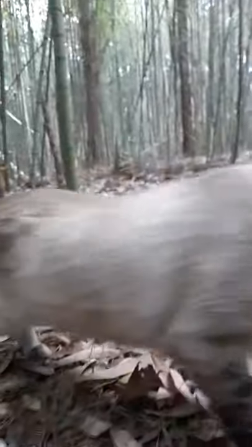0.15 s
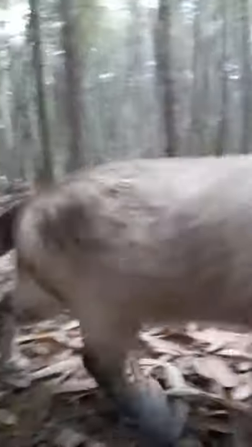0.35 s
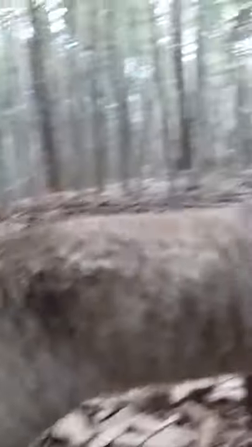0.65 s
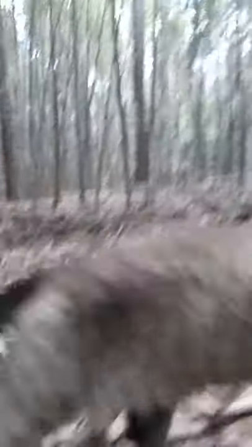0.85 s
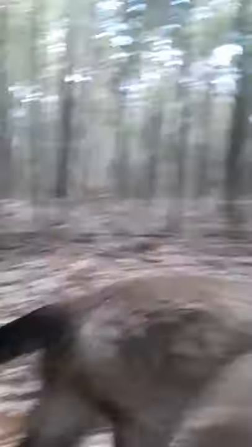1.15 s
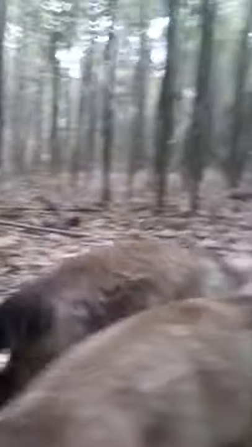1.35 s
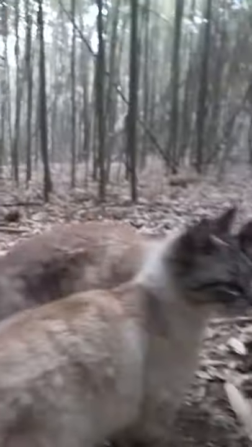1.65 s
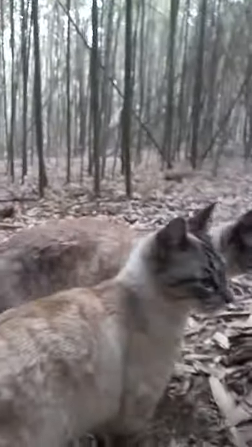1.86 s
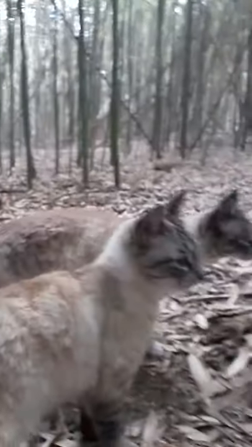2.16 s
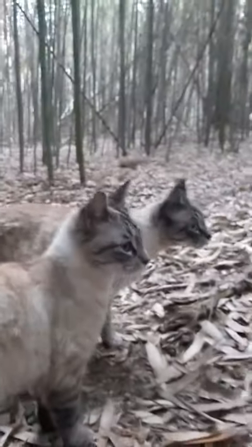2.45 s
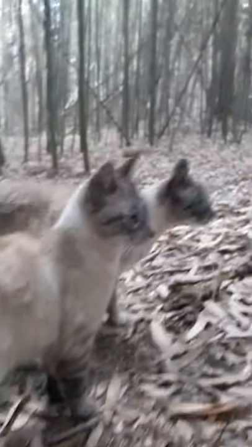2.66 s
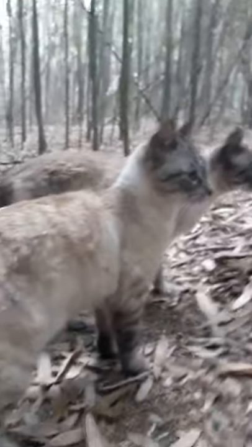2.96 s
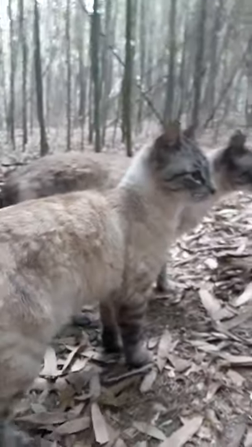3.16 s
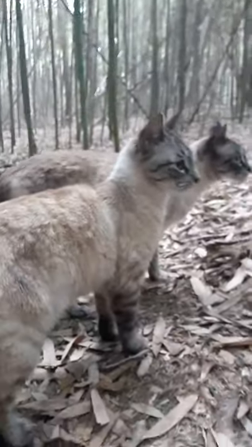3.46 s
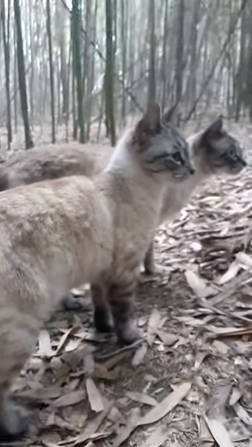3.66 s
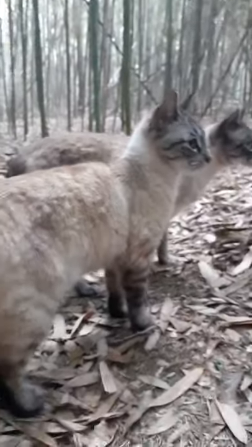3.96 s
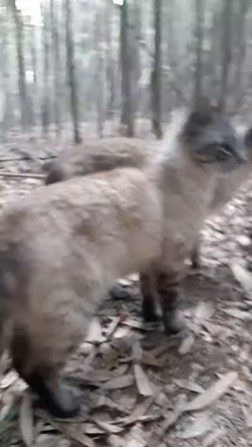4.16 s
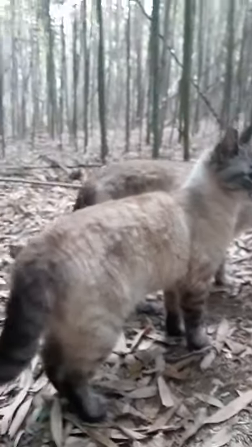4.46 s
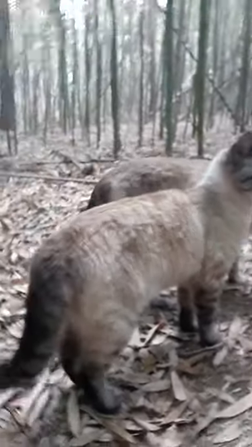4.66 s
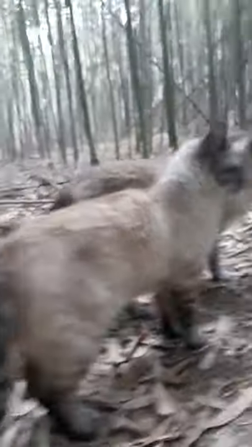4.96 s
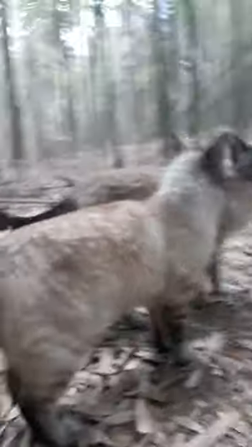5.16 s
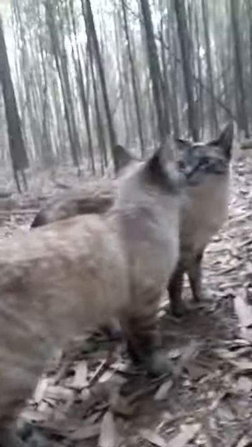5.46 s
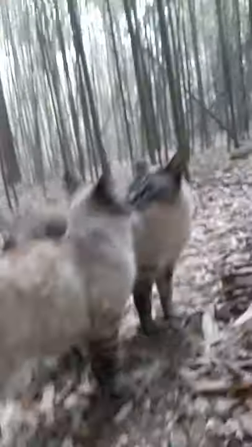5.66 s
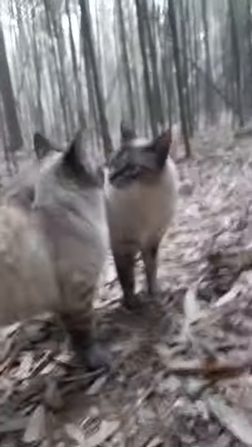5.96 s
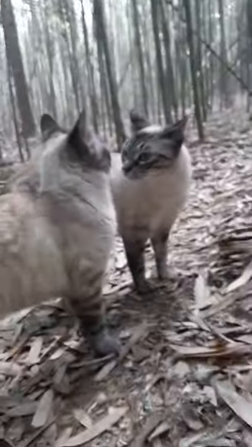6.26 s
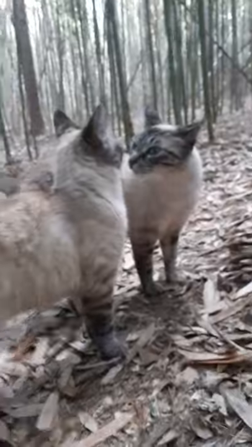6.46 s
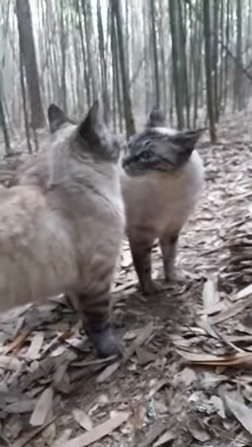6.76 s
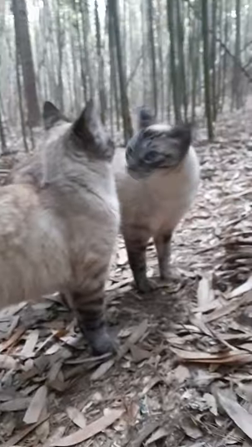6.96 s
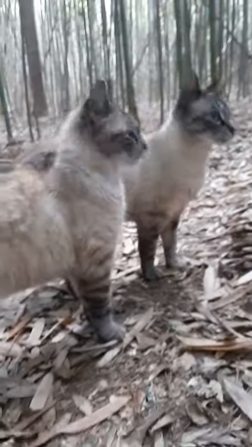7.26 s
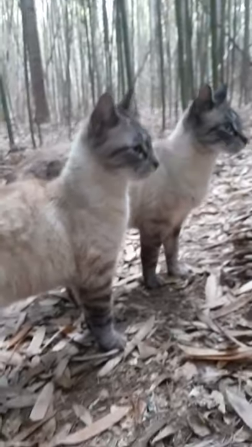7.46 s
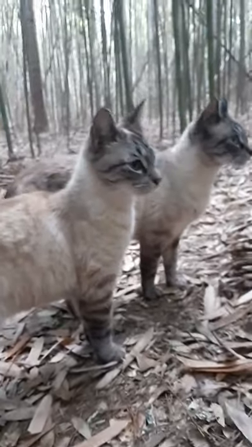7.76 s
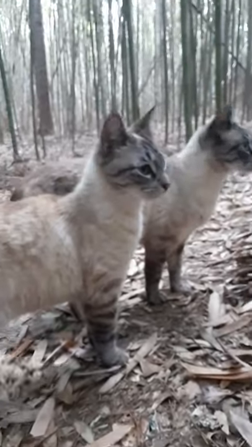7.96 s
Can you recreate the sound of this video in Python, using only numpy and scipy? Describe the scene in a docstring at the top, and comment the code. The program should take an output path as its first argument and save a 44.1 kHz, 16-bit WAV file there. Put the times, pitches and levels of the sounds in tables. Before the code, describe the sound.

Crisp leaf litter rustles near the microphone in bursts, a distant bird whistling fast rising phrases, pausing, then resuming over faint forest air.

```python
"""Dry leaves rustle close by as cats tread them, while a songbird repeats a three-note phrase far off.
The rustle is dense puffs of noise over a scrape; snaps are noise bursts with a ring, thuds damped sines.
The bird is gliding sine tones, smeared by the stems of a bamboo wood into long decaying echoes.
A distant low rumble of narrow noise bands and a faint wide hiss lie beneath it all."""
import sys
import numpy as np
from scipy import signal
from scipy.fft import rfft, irfft, next_fast_len
from scipy.io import wavfile
from scipy.ndimage import uniform_filter1d

SR = 44100
rng = np.random.default_rng(int(sys.argv[2]) if len(sys.argv) > 2 else 0)


def master_out(mix):
    """Clip the mix to full scale and print it as 16-bit PCM to the path in sys.argv[1]."""
    frames = np.transpose(np.atleast_2d(mix))
    ceiling = np.clip(frames, -1, 1)
    pcm = np.round(ceiling * 32767).astype(np.int16)
    wavfile.write(sys.argv[1], SR, pcm)


N = 357210

# spectrum of breaking dry leaf: frequency_hz, density_db (relative, per Hz)
LEAF = [(180, -53), (300, -18.5), (725, -15.5), (1100, -12.5), (1600, -9.5), (2200, -14), (3100, -5),
        (4500, -6), (5400, -6), (6740, -3), (8940, -9), (14200, -2.5), (16000, -6)]
# glides of single notes, shared by the phrases and calls: after_start_s, pitch_hz, level_db (relative)
ARCH = [(0, 1450, -15), (.012, 1880, -8), (.02, 2000, -3), (.045, 1800, -3.5), (.075, 1520, -11)]
FLICK = [(0, 2220, -7), (.006, 2480, -1.5), (.015, 2790, 2), (.024, 2800, -2.5), (.036, 2790, -22)]
RISE = [(0, 3030, -13), (.022, 3400, -2.5), (.043, 3720, 1.5), (.056, 3760, 0.5), (.07, 3700, -7.5),
        (.082, 3620, -16)]
SLOW_ARCH = [(0, 1255, -9), (.025, 1565, -10), (.04, 1741, 1.5), (.075, 1550, -1), (.115, 1302, -8.5)]
SLOW_FLICK = [(0, 1986, -4), (.018, 2332, -0.5), (.032, 2350, -2.5), (.043, 2425, -19.5)]
SLOW_RISE = [(0, 2934, -5), (.02, 3310, 2.5), (.036, 3610, -1.5), (.047, 3640, -6), (.055, 3700, -17)]
WHISTLE = [(0, 2226, -20), (.02, 2240, -9.5), (.07, 2138, -8.5), (.12, 2290, -11), (.2, 2663, 0.5),
           (.26, 2980, -1), (.285, 3016, -3.5), (.295, 3060, -24)]
SEET = [(0, 6870, 5), (.03, 7300, 1), (.05, 7750, 1), (.07, 7500, -16)]
# arch, flick, rise; the slow phrase drags and drops: note glide, after_start_s, level_db (relative)
QUICK = [(ARCH, 0, -9), (FLICK, .09, -5), (RISE, .134, 0)]
SLOW = [(SLOW_ARCH, 0, -14), (SLOW_FLICK, .148, -5.5), (SLOW_RISE, .194, 0)]


def undb(db):
    """Turn decibels into an amplitude factor."""
    return 10 ** (np.asarray(db) / 20)


def unit(x):
    """Scale to an RMS of 1."""
    return x / np.sqrt(np.mean(x ** 2))


def colour(x, points, lo_hz=1., hi_hz=30200.0):
    """Shape x by a (Hz, dB) spectrum between two soft edges."""
    size = next_fast_len(x.shape[-1])
    f = np.arange(size // 2 + 1) * SR / size + 1e-3
    hz, db = np.array(points).T
    gain = undb(np.interp(np.log(f), np.log(hz), db))
    edges = np.sqrt((1 + (lo_hz / f) ** 6) * (1 + (f / hi_hz) ** 6))
    return irfft(rfft(x, size) * gain / edges, size)[..., :x.shape[-1]]


def ring(x, hz, width_hz):
    """One resonance, gain 1 at the centre."""
    return signal.lfilter(*signal.iirpeak(hz, hz / width_hz, SR), x)


def walk(rate):
    """Random levels held 1 / rate s and slewed twice; spread near 1."""
    hold = int(SR / rate)
    steps = np.repeat(rng.standard_normal(N // hold + 1), hold)
    return 1.35 * uniform_filter1d(uniform_filter1d(steps, hold), hold)[:N]


def part_shared_noise(common, length):
    """Noise for two ports, of which the power share common is alike at both."""
    shared = np.sqrt(common) * rng.standard_normal(length)
    return shared + np.sqrt(1 - common) * rng.standard_normal((2, length))


def ports(x, pan_db, lag):
    """Two spaced ports: the left hears x lag samples later and pan_db louder than the right."""
    n = np.arange(len(x[0]))
    late = np.clip(n - np.rint(lag).astype(int), 0, n[-1])
    return np.array([x[0][late] * undb(pan_db / 2), x[1] * undb(-pan_db / 2)])


def add(out, start_s, x):
    """Mix x into out from start_s, trimming whatever falls outside."""
    i = int(start_s * SR)
    x = x[..., max(-i, 0):N - i]
    out[..., max(i, 0):max(i, 0) + x.shape[-1]] += x


def cats(s):
    """Port lag in samples and left-minus-right dB at time s, as the cats move about."""
    # where the cats are: time_s, left_lag_samples, left_minus_right_db
    places = [(0, 7.5, -3), (.45, 9.3, -3), (.83, 9.6, -2), (1.1, 12.8, -3.5), (1.7, 16.3, -5.5),
              (3, 16.7, 0), (4.3, 19.2, -6.5), (4.8, 17.7, -4.5), (5.6, 18.5, -4.5), (6.15, 21.6, -11),
              (6.7, 18.8, -7), (8.1, 18.9, -1.5)]
    at, lag, pan_db = np.transpose(places)
    return np.interp(s, at, lag), np.interp(s, at, pan_db)


def scuffing():
    """Gains of crunch, middle, treble and sheen: every scuff swells and dies away, and their powers add."""
    # a paw or tail scuffs the leaves: peak_s, treble_db (relative), swell_s and die_s (per 20 dB, sign
    # ignored), crunch_db (low band against treble), bright_db (raises the sheen, lowers the middle)
    scuffs = [(.002, -31.5, 2, 0.06, -18, 0.), (.1, -50.5, 0.6, 0.34, -24, 0.),
              (0.202, -38.5, 0.07, 0.09, -27, 0.7), (0.397, -34, .17, 0.1636, -22, -0.1),
              (.85, -42, 0.16, 0.16, -25.5, 2.5), (0.968, -42.5, 0.27, 0.14, -27, -0.3),
              (1.17, -56, -0.1, 0.32, -31, .6), (1.35, -51, 1, 0.36, -29, -0.9),
              (1.63, -52, 0.03, 0.38, -20, 0.), (1.76, -57, 0.3, .5, -29, 0),
              (2.5, -65.5, .3, 0.27, -16, -0.5), (3.3, -70.5, 0.8, 0.56, -11, -1),
              (3.515, -64.5, 0.1, 0.1, -25.5, 1.5), (3.69, -69.5, -0.05, 0.03, -27, 0.),
              (3.974, -62, .025, .07, -30, 9.), (4.21, -60.5, .08, 0.5, -25, -2),
              (4.3, -52.5, 0.01, 1.5, -25, -0.5), (4.422, -41, 0.0877, 0.14, -37, 1.5),
              (4.57, -50, 0.29, -0.3, -21, -2.5), (4.671, -38, 0.0673, 0.0054, -22, -.6),
              (4.745, -35.5, .025, 0.1832, -22, -2.5), (4.845, -35.5, 0.2038, 0.0559, -15.5, 0.5),
              (4.94, -47.5, 0.1, 0.14, -24, 1), (5.03, -56, 0.05, 0.36, -11.5, 0),
              (5.211, -50.5, 0.28, 0.06, -19, -1.5), (5.35, -56, 0, .5, -19.5, 1.5),
              (5.61, -53, 0.39, 0.34, -16, 0.), (5.8, -65, 0.9, 0.65, -20, -0.5),
              (6.13, -48, 0.2, 0.09, -30.5, 1), (6.175, -51, 0.11, -0.02, -30, 1),
              (6.26, -54.5, 0, -0.23, -30, 0.5), (6.31, -59, .03, 0, -22, 0.),
              (6.38, -56.5, 0, 0.03, -24.5, 0.), (6.46, -60, -0.3, 0.2, -27, 3),
              (6.592, -54.5, 0, 0.15, -27, 1), (6.77, -65.5, 2.8, 0.26, -23, 0.3),
              (6.95, -74, -0.5, .14, -26, 3), (7.33, -63.5, 0.1, 0.23, -33, 1.5),
              (7.9, -70, 1.6, 8.5, -18.5, 2.5)]
    stir_db, stir_crunch_db = -86, -6  # leaves never lie quite still
    t = np.arange(0, N + 64, 64) / SR
    power = undb(2 * (stir_db + np.array([[stir_crunch_db], [0], [0], [0]])))
    for peak_s, db, swell_s, die_s, crunch_db, bright_db in scuffs:
        level_db = db - 20 * np.maximum((peak_s - t) / abs(swell_s), (t - peak_s) / abs(die_s))
        band_db = np.array([[crunch_db], [-bright_db], [0], [bright_db]])
        power = power + undb(2 * (level_db + band_db))
    return (np.interp(np.arange(N) / SR, t, np.sqrt(p)) for p in power)


def rustle(breaks_per_s=900., spread_db=4.0, tail_s=0.0014, scrape=0.33):
    """Tiny fractures of very uneven size, each a short puff of noise, over the scrape of leaf on leaf."""
    crunch, middle, treble, sheen = scuffing()
    lag, pan_db = cats(np.arange(N) / SR)
    sizes = undb(spread_db * np.minimum(rng.exponential(size=N), 3.5))
    breaks = (rng.random(N) < breaks_per_s / SR) * sizes
    middle = middle * undb(-4.5 + 0.58 * pan_db)  # the middle dulls as the cats move to the right
    # each break puffs in all four bands; the lower the band, the longer the puff: low_edge_hz,
    # high_edge_hz, gain, level_db, tail factor, power share common to both ports, shading factor
    bands = [(256, 1390, crunch, 3.0, 3.0, 0.77, 0.8),
             (1330, 4600, middle, 0, 2.2, 0.25, 0.82),
             (4060, 7750, treble, -3.0, 1.95, 0.12, 0.8),
             (8360, 13700.0, sheen, -1.5, 1.3, 0.13, 1.22)]
    out = 0
    for lo, hi, gain, db, longer, common, shade in bands:
        hits = breaks ** (1 / longer ** 0.24) * undb(4.8 * rng.standard_normal(N))
        decay = np.exp(-1 / (tail_s * longer * SR))
        puffs = unit(signal.lfilter([1], [1, -decay], hits))
        noise = part_shared_noise(common, N)
        band = unit(colour(noise * (puffs + scrape), LEAF, lo, hi))
        uneven = undb(db + 2.22 * walk(25))
        out = out + ports(band * gain * uneven, shade * pan_db, lag)
    return out


def stems(x, t60_s, build_s, common=0.22, dull_hz=5000.0, patchy_db=1.5):
    """Scatter from countless stems: a decaying noise tail of unit energy; the treble dies twice as fast."""
    t = np.arange(int(1.6 * SR)) / SR
    fade = np.exp(-np.log(1000) * t / t60_s)
    noise = part_shared_noise(common, len(t))
    low = signal.lfilter(*signal.butter(2, dull_hz, fs=SR), noise)
    tail = (low + (noise - low) * fade) * fade * (1 - np.exp(-t / build_s))
    # stems stand in clumps, so the echoes come in bunches
    tail = tail * undb(patchy_db * walk(38.5)[:len(t)])
    tail = tail / np.sqrt(np.sum(tail ** 2) / 2)
    return signal.fftconvolve(x[None], tail)[:, :N]


def whistle_note(shape, pitch_factor, db):
    """One pure tone that glides in pitch and swells along its shape."""
    at, hz, swell_db = np.transpose(shape)
    t = np.arange(int(at[-1] * SR)) / SR
    edge = np.clip(np.minimum(t, at[-1] - t) / 0.0018, 0, 1)
    # the syrinx rounds every corner of the glide
    glide = uniform_filter1d(pitch_factor * np.interp(t, at, hz), size=260, mode="nearest")
    tone = np.sin(2 * np.pi * np.cumsum(glide) / SR)
    return np.sqrt(2) * tone * edge * undb(db + np.interp(t, at, swell_db))


def bird():
    """Pure gliding whistles, heard direct and through the wood."""
    # phrase kind, start_s, pitch factor of the last note, level_db, extra_db of the earlier notes
    phrases = [(QUICK, -0.18, 1, -58, 0.), (QUICK, .122, .94, -51, 0.), (QUICK, .402, .94, -48.5, -1.7),
               (QUICK, .688, 1, -48.5, .5), (QUICK, 0.97, 0.97, -46, 0.), (QUICK, 1.246, .98, -46, 1.5),
               (QUICK, 1.528, 0.97, -46.5, -1.5), (QUICK, 1.804, .99, -46, -.6),
               (QUICK, 2.081, 0.99, -46, -.6), (SLOW, 2.368, 0.96, -50.5, -0.54),
               (SLOW, 2.711, 0.98, -49, .6), (SLOW[:1], 3.075, .94, -50.5, 0.),
               (QUICK, 7.48, 0.97, -46, -2.1), (QUICK, 7.755, .97, -45.5, -2.2),
               (QUICK, 8.035, .97, -45, -0.56)]
    # single calls: note glide, start_s, pitch factor, level_db
    lone_calls = [(SEET, 2.545, 1.001, -60), (SEET, 6.405, 1.001, -60.5), (WHISTLE, 6.522, 1.015, -55),
                  (WHISTLE, 7.11, .99, -50)]
    # peep glide: after_start_s, pitch_hz, level_db (relative)
    peep = [(0, 2784, -7), (.02, 2778, -0.5), (.05, 2770, -12), (.065, 2770, -19)]
    # near and far stems: t60_s, build_up_s, level_db
    wood = [(.3, 0.0036, -4), (.95, 0.018, -3.5)]

    notes = []
    for kind, start_s, last_factor, db, earlier_db in phrases:
        for k, (shape, after_s, part_db) in enumerate(kind):
            last = k == len(kind) - 1
            factor = last_factor if last else 1
            note_db = db + part_db + (0 if last else earlier_db)
            notes.append((shape, start_s + after_s, factor, note_db))
    notes += lone_calls
    # a second bird: five even peeps
    notes += [(peep, 3.33 + k * 0.2025, 1, -75) for k in range(5)]

    song = np.zeros(N)
    for shape, start_s, factor, db in notes:
        if -shape[-1][0] < start_s < N / SR:
            add(song, start_s, whistle_note(shape, factor, db))
    echoes = sum(undb(db) * stems(song, t60_s, build_s) for t60_s, build_s, db in wood)
    # leaves on the way make the direct sound tremble
    direct = song * undb(-2.5 + 2.5 * walk(70.))
    return ports(direct + echoes, pan_db=2, lag=-10)


def air():
    """Faint wide hiss and a wavering low rumble; the bass is alike at both ports."""
    # hiss spectrum: frequency_hz, density_db (relative, per Hz)
    hiss_spectrum = [(25, -24), (40, -10.5), (60, -8), (100, -3.5), (130, -1.5), (200, -9), (300, -14.5),
                     (500, -21), (1000, -24.5), (2000, -27.5), (3500, -28), (7300, -21.5), (9500, -30.5),
                     (16000, -32)]
    # rumble bands: centre_hz, width_hz (of each of two passes), start_db, end_db
    rumble_bands = [(71.5, 26, -84.5, -78.5), (114.5, 26, -76, -80.5), (139.3, 20.4, -90, -72),
                    (170.9, 13, -84.5, -77)]
    # likeness of the ports: frequency_hz, power share common to both
    likeness = [(60, 0.95), (250, 0.74), (700, 0.32), (1500, 0.11)]
    hz, like = np.array(likeness).T
    shared = colour(rng.standard_normal(N), np.c_[hz, 10 * np.log10(like + 1e-3)])
    separate = colour(rng.standard_normal((2, N)), np.c_[hz, 10 * np.log10(1 - like)])
    noise = shared + separate
    rumble = 0
    for centre_hz, width_hz, start_db, end_db in rumble_bands:
        level = undb(np.linspace(start_db, end_db, N) + 2.7 * walk(1.45))
        band = ring(ring(noise, centre_hz, width_hz), centre_hz, width_hz)
        rumble = rumble + level * unit(band)
    return undb(-69.0) * unit(colour(noise, hiss_spectrum)) + rumble


def snaps(fade_s=0.00075):
    """A dry leaf breaks: a wide crack, a brief ring of the flake, a knock in the litter."""
    # time_s, level_db (relative), ring_hz, body_db (relative)
    breaking_leaves = [(0.0897, -24, 10400, -36.5), (0.1463, -32, 7140, -38), (0.1825, -41, 6060, -39),
                       (0.1998, -22.5, 6600, -39), (0.392, -26, 6300, -30.5), (0.4057, -22, 6650, -28.5),
                       (0.4224, -26, 6230, -20.5), (0.4602, -25, 5830, -20.5), (0.493, -34.5, 5700, -17),
                       (0.5183, -39, 5600, -17), (0.782, -33, 6650, -35), (0.818, -24, 7640, -33.5),
                       (0.833, -28.5, 5040, -27), (0.8635, -22, 5300, -26), (0.9735, -32, 4900, -26.5),
                       (1.148, -35.5, 11200, -42), (1.3873, -36, 6030, -29), (1.4441, -43, 5390, -36),
                       (1.6155, -32, 12100, -24), (1.6293, -30, 6620, -29), (1.6992, -39, 6030, -40),
                       (1.7397, -32.5, 11370, -45), (1.8845, -45.5, 5920, -18), (1.9442, -40.5, 10270, -41),
                       (2.5376, -38, 6850, -38), (3.5244, -55, 5010, -26), (3.683, -56, 6520, -32),
                       (3.9744, -49, 10500, -40.5), (4.2063, -45, 4300, -36), (4.2843, -33.5, 4200, -42),
                       (4.361, -41, 6630, -40), (4.3795, -36, 4380, -37), (4.3965, -22.5, 11400, -54),
                       (4.4188, -24.5, 6800, -40), (4.4333, -25.5, 6740, -54), (4.4428, -27.5, 7200, -44),
                       (4.5291, -32.5, 6520, -27), (4.5438, -36, 6640, -24), (4.571, -16, 6250, -28),
                       (4.6499, -27, 6350, -22), (4.6787, -23, 6700, -29), (4.7382, -31, 7700, -26),
                       (4.7465, -22.5, 7640, -22), (4.8065, -24, 6270, -22.5), (4.8198, -17, 5560, -35.5),
                       (4.851, -24, 6240, -27), (4.9267, -31, 7240, -34), (4.9657, -29, 11000, -43),
                       (5.0312, -26.5, 5640, -47), (5.0381, -27, 6000, -53), (5.164, -42, 6400, -30),
                       (5.218, -35, 11400, -36), (5.5787, -31.5, 6440, -50), (5.5997, -37, 7250, -33),
                       (5.6995, -40, 6860, -50), (5.734, -43, 6900, -49), (6.0322, -41, 6750, -45),
                       (6.0438, -33.5, 5740, -39), (6.115, -34.5, 10600, -39), (6.1306, -30.5, 6660, -39),
                       (6.1454, -36, 6990, -37), (6.1714, -33.5, 10600, -46), (6.2143, -33, 7100, -56),
                       (6.2315, -33, 7060, -43), (6.2525, -31.5, 12100, -35), (6.2604, -32.5, 6800, -44),
                       (6.3093, -40.5, 6850, -28), (6.3468, -37.5, 6590, -39), (6.3707, -30.5, 8550, -30),
                       (6.3806, -35, 6810, -38), (6.5886, -37, 6400, -47), (6.635, -41.5, 6200, -30),
                       (6.7755, -39, 6630, -40), (6.9517, -35, 6260, -55), (7.1173, -54.5, 7110, -27),
                       (7.3262, -46.5, 6710, -36.5), (7.441, -53, 7000, -29), (7.6136, -45.5, 6600, -29.5)]
    lead = 30  # samples of silence ahead, so that the lag has room
    out, t = np.zeros((2, N)), np.arange(1500) / SR
    for s, db, ring_hz, body_db in breaking_leaves:
        lag, pan_db = cats(s)
        noise = rng.standard_normal((3, len(t)))
        burst = (noise[0] + 0.48 * noise[1:]) * np.exp(-t / fade_s)
        crack = colour(burst, LEAF, 1850.0)
        crack = .5 * crack + 2.06 * ring(crack, ring_hz, ring_hz / 4.9)
        knock = ring(noise[0] * np.exp(-t / (fade_s + 0.0023)), 1450.0, 1400.0)
        both = crack / np.abs(crack).max() + undb(body_db + 11.0) * knock / np.abs(knock).max()
        scattered_db = pan_db + 1.5 * rng.standard_normal()
        heard = ports(np.pad(both, ((0, 0), (lead, 0))), scattered_db, lag)
        add(out, s - lead / SR, undb(db + 5.0) * heard)
    return out


def thuds(cycles=0.66):
    """Paws on soft ground: a cycle or two of low ring."""
    # time_s, level_db (relative), pitch_hz
    paw_falls = [(1.629, -50, 150), (1.88, -52, 147), (4.303, -55, 165), (5.038, -47, 320),
                 (5.044, -49.5, 207), (6.704, -48, 290), (6.726, -39.5, 253)]
    out, t = np.zeros((2, N)), np.arange(3000) / SR
    for s, db, hz in paw_falls:
        damped = np.sin(2 * np.pi * hz * t) * np.exp(-t * hz / cycles)
        add(out, s, undb(db + 3.5) * ring(damped, hz, 1.9 * hz) * np.ones((2, 1)))
    return out


def scene():
    """Leaves and paws close by, the bird in the wood, and the air around them."""
    near = rustle() + snaps() + thuds()
    # close sounds come back faintly from the nearest stems
    near_echoes = undb(-13.5) * stems(near[1], 0.22, 0.00047)
    return bird() + near + near_echoes + air()


def record(dry):
    """Steep low-pass: treble drops above 15.75 kHz and is gone above 16.8 kHz."""
    treble_drop = signal.ellip(6, .3, 22, 15750, fs=SR, output="sos")
    top_cut = signal.ellip(10, .2, 70, 16800, fs=SR, output="sos")
    return signal.sosfilt(top_cut, signal.sosfilt(treble_drop, dry))


dry = scene()
out = record(dry)
master_out(out)
```